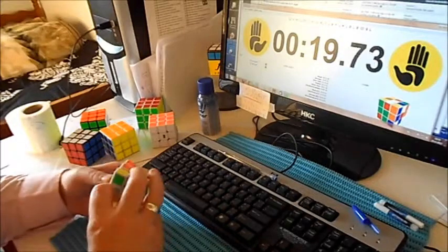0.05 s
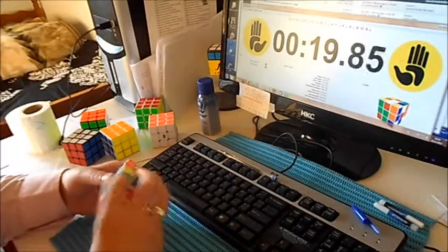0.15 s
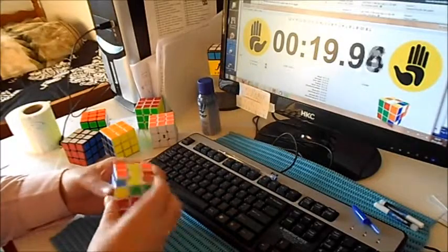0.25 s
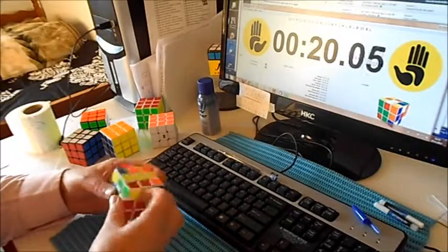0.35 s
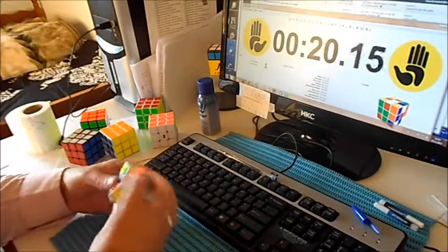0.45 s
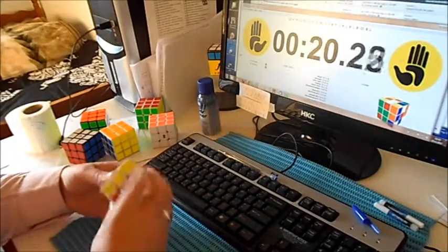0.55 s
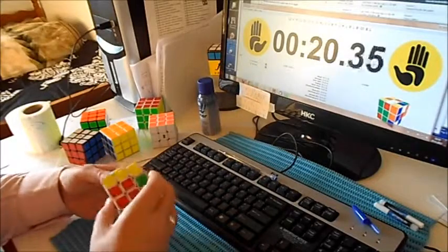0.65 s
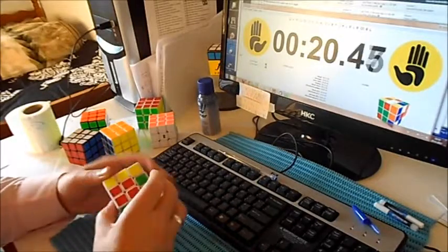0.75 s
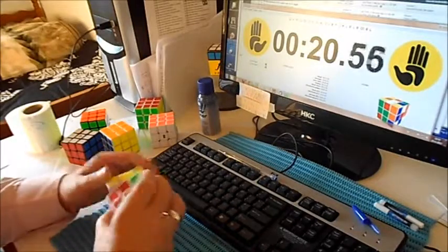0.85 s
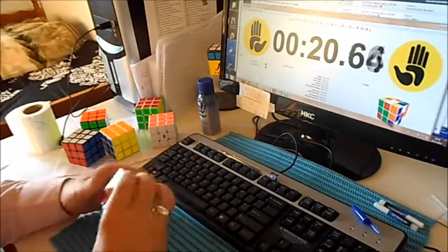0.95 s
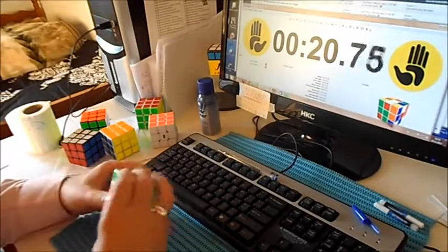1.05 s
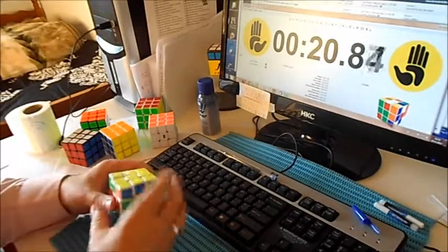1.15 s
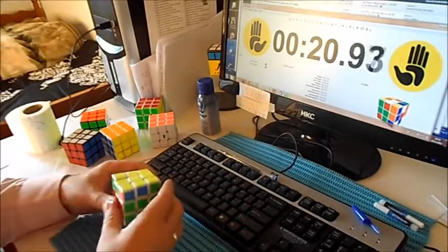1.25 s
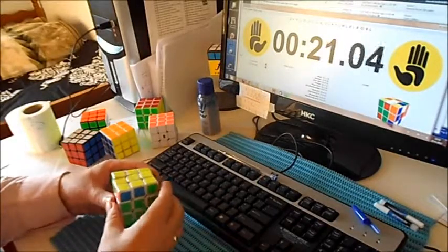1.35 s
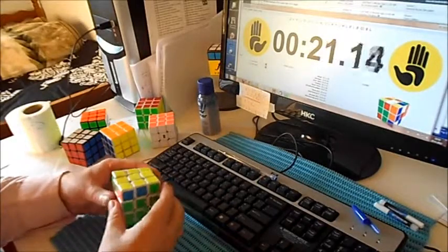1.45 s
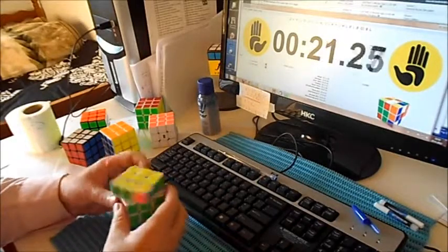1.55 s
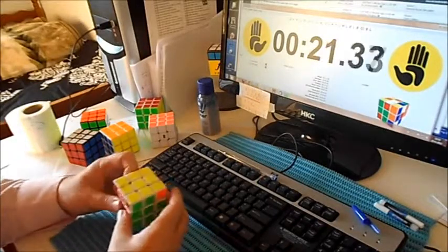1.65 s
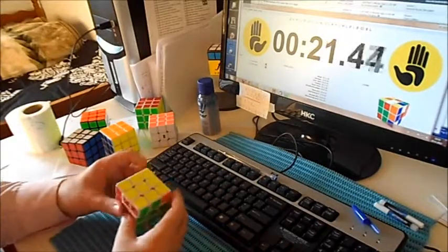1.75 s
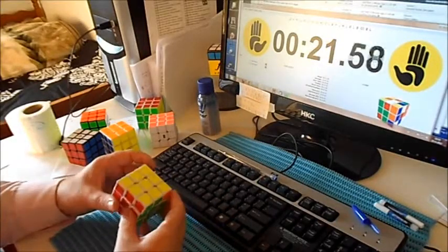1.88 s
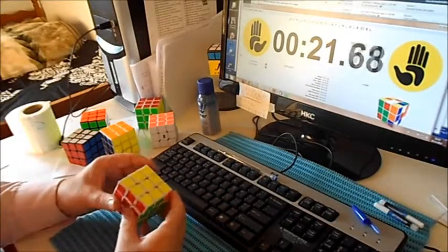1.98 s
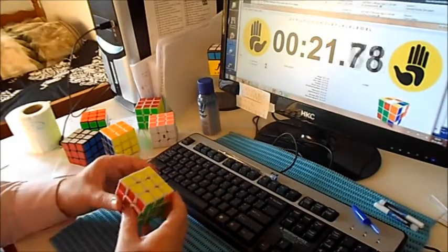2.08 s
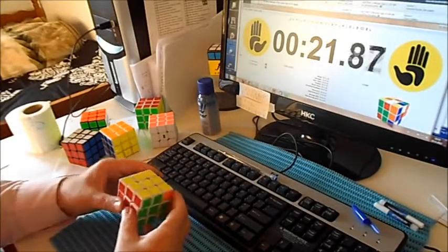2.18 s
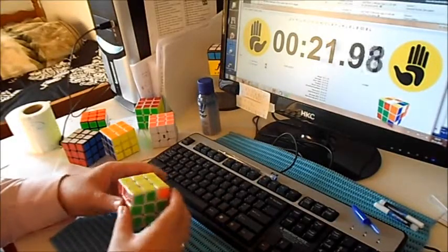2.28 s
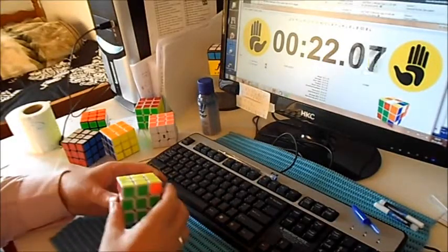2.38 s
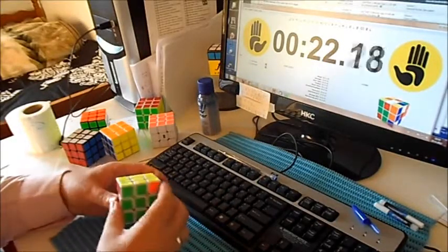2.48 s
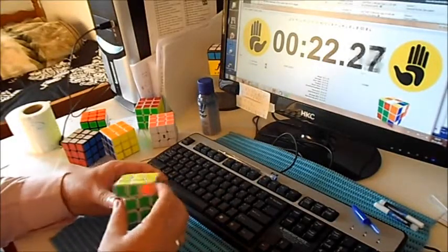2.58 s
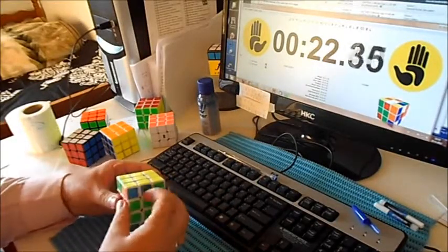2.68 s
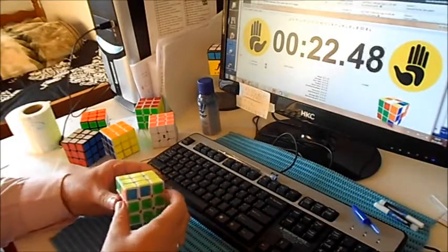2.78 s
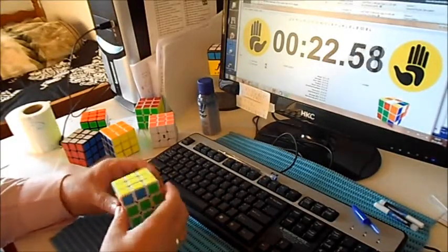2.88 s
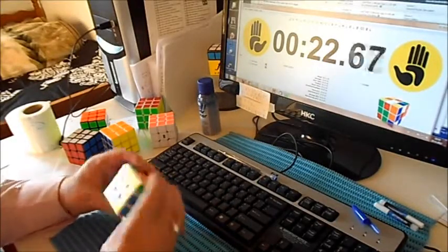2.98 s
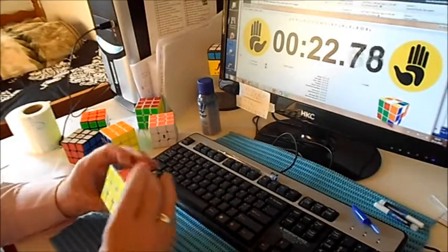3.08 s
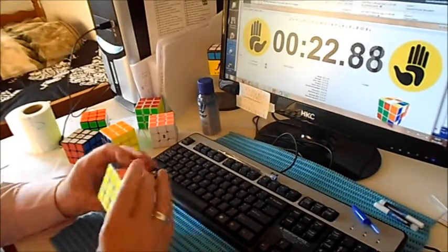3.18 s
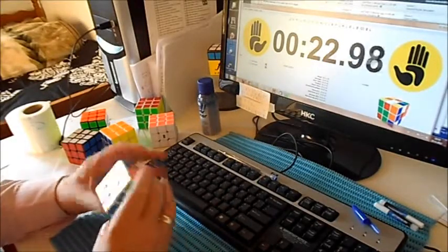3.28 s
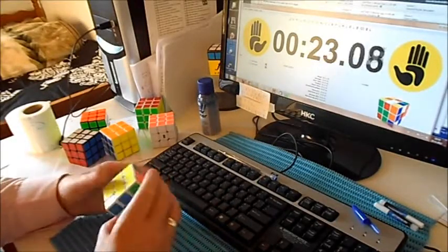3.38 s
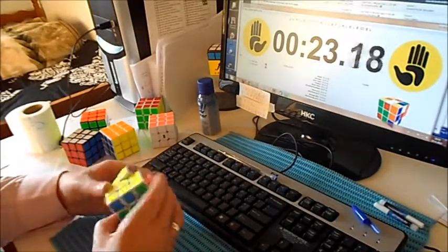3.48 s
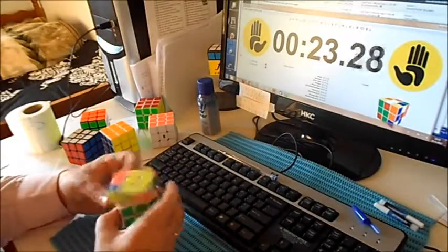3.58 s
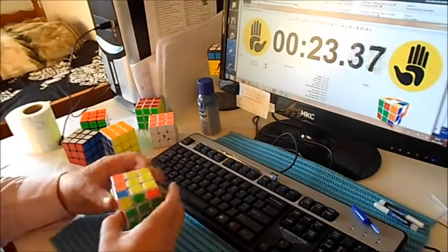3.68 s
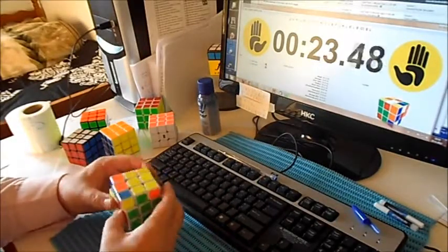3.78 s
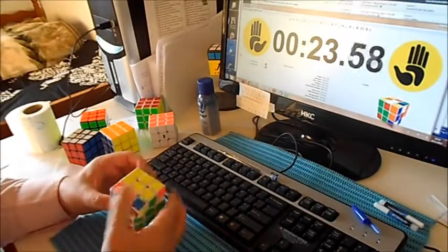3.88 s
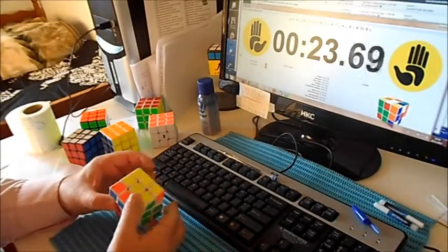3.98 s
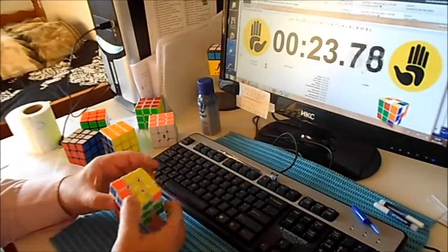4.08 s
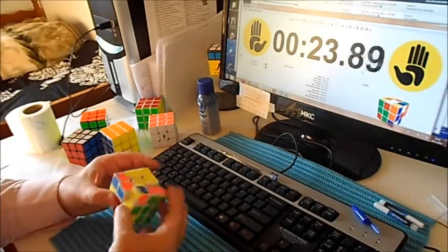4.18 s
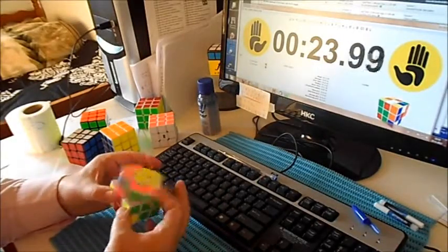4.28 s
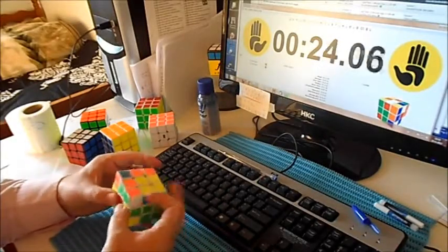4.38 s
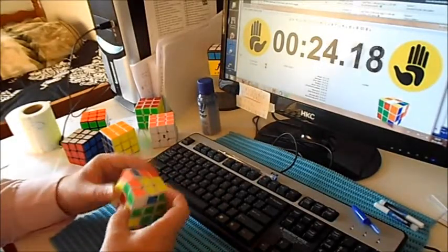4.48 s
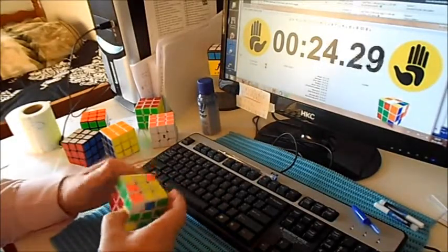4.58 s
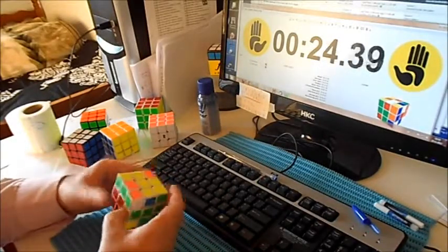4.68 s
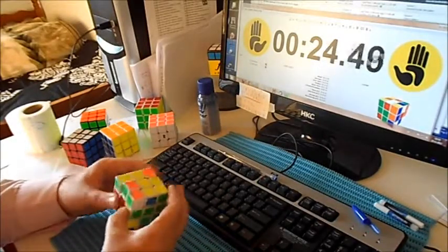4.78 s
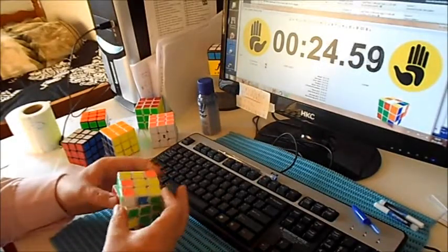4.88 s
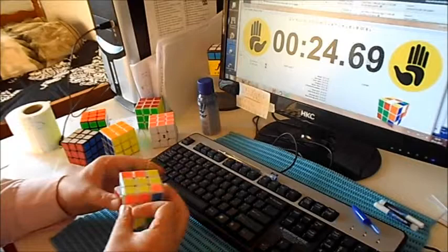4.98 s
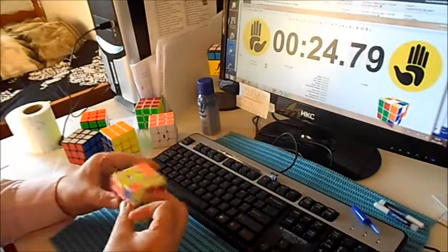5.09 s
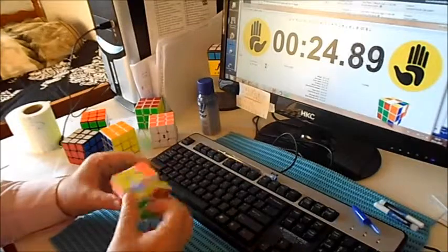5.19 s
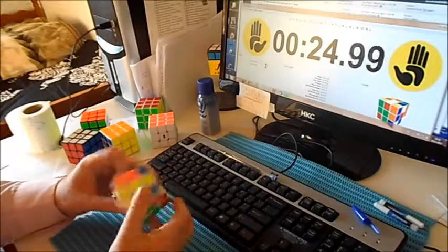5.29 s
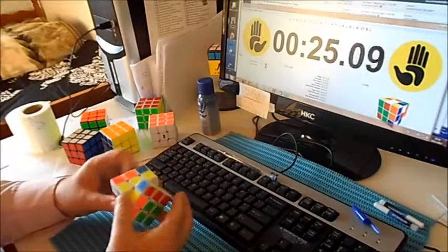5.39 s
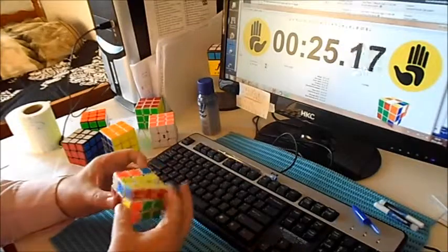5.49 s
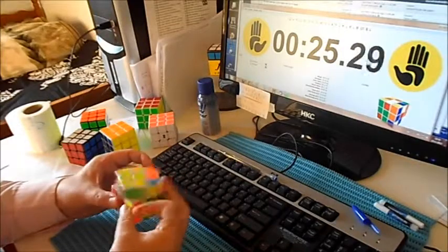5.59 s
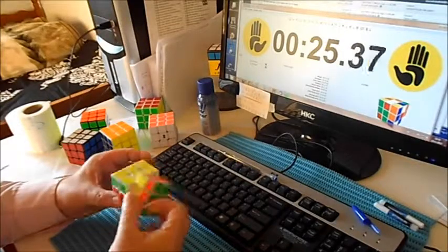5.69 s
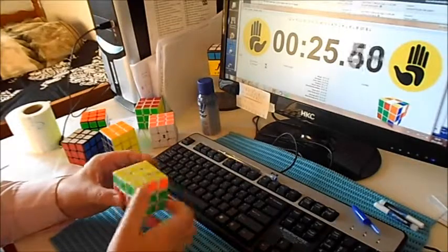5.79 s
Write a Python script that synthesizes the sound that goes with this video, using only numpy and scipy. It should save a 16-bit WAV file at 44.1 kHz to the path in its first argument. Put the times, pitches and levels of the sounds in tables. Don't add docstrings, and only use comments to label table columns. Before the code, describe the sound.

A plastic puzzle cube is turned fast in the hands, dry clacks and rattles in bursts with short pauses, over faint computer hum.

```python
import sys
import numpy as np
from scipy import signal
from scipy.fft import rfft, irfft
from scipy.io import wavfile

SR = 44100
rng = np.random.default_rng(int(sys.argv[2]) if len(sys.argv) > 2 else 0)


def ratio(d):
    e = np.asarray(d, float) / 20
    return 10 ** e


def master(y):
    cut = np.clip(np.atleast_2d(y).T, -1, 1)
    pcm = np.round(cut * 32767)
    wavfile.write(sys.argv[1], SR, pcm.astype(np.int16))


N = 257975

# (frequency [Hz], density [dB per Hz])
PLASTIC = [(710, -49), (1200, -3.5), (2760, -5), (3030, -1), (3860, -2.5), (5540, -2), (8250, -5.5),
           (9840, -9.5), (10300, -7.5), (11000, -8), (14300, -38), (22000, -120)]

# (time [s], peak level [dB], brightest frequency [Hz], rattle t60 [s], edge level [dB])
OPENING = [(0.0386, -22.5, 4970, 0.024, 15), (0.0445, -41, 5040, 0.04, -3), (0.0514, -28, 4440, 0.04, -2.0),
           (0.0568, -22, 5860, 0.046, 5), (0.0646, -19, 7320, 0.066, -1), (0.0742, -12, 4310, 0.041, 12),
           (0.0823, -7.5, 4870, 0.027, -2), (0.0848, -8, 4000, 0.024, -8), (0.0898, -3, 5640, 0.063, 7),
           (0.0981, -7, 5770, 0.069, -11), (0.101, -25, 5770, 0.037, 9), (0.1051, -8, 7350, 0.077, -1),
           (0.1201, -4, 5300, 0.042, 1), (0.1275, -29, 6420, 0.04, -4.0), (0.1325, -42, 3790, 0.04, 0.0),
           (0.1405, -47, 4480, 0.04, 0.0), (0.202, -30, 5430, 0.04, 3), (0.2238, -31, 5000, 0.04, 10),
           (0.2355, -26, 3060, 0.04, -3), (0.2469, -9, 6760, 0.037, -4), (0.2573, -11, 3600, 0.059, 2),
           (0.2631, -13, 6120, 0.03, -8), (0.2778, -7, 7150, 0.044, 8), (0.3063, -18, 5210, 0.036, -6),
           (0.3133, -34, 5860, 0.04, -7), (0.3181, -36, 5860, 0.04, -21)]
TRIGGER = [(0.3512, -16, 4330, 0.045, -9), (0.361, -16, 6200, 0.033, -10), (0.3655, -10, 4860, 0.026, -10),
           (0.3724, -14, 4820, 0.044, -2), (0.3903, -10, 3560, 0.02, -8), (0.3935, -3.5, 5700, 0.031, 21),
           (0.409, -40, 3960, 0.04, 0.0), (0.4141, -36, 6240, 0.04, -4), (0.423, -25, 3880, 0.04, 1.0),
           (0.453, -21, 3720, 0.021, 13), (0.465, -15, 6100, 0.056, 0), (0.478, -22, 3920, 0.037, 2),
           (0.4825, -30, 4650, 0.04, -1.0), (0.495, -26.0, 4780, 0.043, -4.0),
           (0.5108, -21, 4820, 0.048, -8), (0.518, -20, 5380, 0.045, 4), (0.5337, -16, 4820, 0.056, 8),
           (0.5388, -20, 3000, 0.036, 14), (0.5458, -23, 7020, 0.04, -1), (0.5538, -10.5, 8600, 0.029, -4),
           (0.5598, -17, 5860, 0.043, 0), (0.5717, -16, 4940, 0.033, -6), (0.5784, -18, 4690, 0.078, 6),
           (0.5942, -27, 4910, 0.04, 10), (0.6018, -13, 6930, 0.094, -2), (0.6091, -2, 5300, 0.045, 7),
           (0.6105, -1, 5600, 0.049, 5), (0.6254, -50, 5730, 0.04, 6), (0.6387, -53, 4650, 0.04, 1.0),
           (0.677, -37, 3760, 0.04, -2.0)]
SINGLES = [(0.7788, -38.5, 6160, 0.048, 13), (0.8612, -31, 5210, 0.036, 12), (0.8685, -19, 2600, 0.13, 2.5),
           (0.905, -21, 6200, 0.036, -4), (0.9095, -10.5, 4400, 0.054, 2), (0.9324, -17, 4610, 0.025, -7),
           (0.9453, 1.5, 6140, 0.039, 3), (0.9547, -8, 7750, 0.029, -9), (0.9617, -16, 6330, 0.028, 5),
           (0.97, -28, 7450, 0.037, 1), (0.9786, -42, 3270, 0.04, -2.0), (1.0915, -30, 3860, 0.059, -14),
           (1.1374, -35, 6330, 0.032, -6), (1.425, -53, 5170, 0.032, -3), (1.5881, -4.5, 3940, 0.041, 5),
           (1.592, -7.5, 5990, 0.043, -8), (1.5969, -8.5, 4220, 0.035, 3), (1.608, -18, 4260, 0.04, -6.5),
           (1.621, -34, 4610, 0.04, 3), (1.638, -12.5, 4000, 0.04, 11), (1.652, -25, 3320, 0.04, -1),
           (1.657, -13, 6240, 0.058, -3), (1.664, -24, 5340, 0.04, 2), (1.675, -25, 5600, 0.045, -3),
           (1.68, -12, 4650, 0.067, 5.5), (1.6872, -18, 5000, 0.055, -5), (1.6924, -3, 4730, 0.054, 9.5),
           (1.6993, -38, 4600, 0.04, 13), (1.7716, -36.5, 4180, 0.07, 2), (1.8767, -42, 2760, 0.04, 2.0)]
LOOKING = [(1.928, -35, 3530, 0.046, 3), (2.2348, -45, 4500, 0.04, 0), (2.2738, -32.5, 4960, 0.0091, -13),
           (2.407, -40, 3000, 0.037, -3), (2.6447, -19.5, 4820, 0.11, -5), (2.653, -21.5, 4760, 0.048, -7),
           (2.666, -17.5, 5300, 0.033, -5), (2.6793, -30, 5040, 0.04, 6), (2.6857, -21, 7800, 0.04, 12),
           (2.693, -10, 5030, 0.052, -9), (2.699, -31, 4440, 0.04, -3), (2.7104, -4, 5600, 0.023, 21),
           (2.7175, -19, 5680, 0.04, 1), (2.724, -43, 6200, 0.037, -14), (2.9535, -44, 6240, 0.04, 10),
           (3.194, -34.5, 6200, 0.068, 9), (3.2875, -29.5, 3670, 0.083, -6),
           (3.5126, -31.5, 6000, 0.037, -2)]
RESTART = [(3.5386, -18.5, 3940, 0.018, -3), (3.546, -10, 3140, 0.053, 3),
           (3.5495, -15.5, 4150, 0.093, 4.5), (3.597, -14, 5360, 0.022, 10), (3.6028, -8.5, 7110, 0.12, -3),
           (3.632, -7.5, 3600, 0.049, 3), (3.6346, -3.5, 5300, 0.046, 10), (3.6415, -6, 4040, 0.034, 5),
           (3.6479, -17, 5340, 0.035, -3.0), (3.6537, -34, 6160, 0.04, 2.0), (3.6572, -1.5, 3770, 0.024, 3),
           (3.6605, -2.5, 4800, 0.057, 10.5), (3.6645, -25, 8270, 0.053, 16), (3.6717, -32, 5640, 0.04, 7),
           (3.6768, -16, 7240, 0.056, 6), (3.7378, -28.5, 6070, 0.05, -3), (3.7513, -30, 4020, 0.049, -7),
           (3.7718, -63, 4440, 0.04, 3), (3.8598, -32, 3360, 0.034, 9), (3.8854, -23.5, 5460, 0.041, 2),
           (3.9024, -25.5, 2750, 0.052, -3), (3.91, -22.5, 5340, 0.04, 3), (3.9145, -26, 6070, 0.04, -3.0),
           (3.9393, -25.5, 3000, 0.1, -9), (3.95, -10.5, 5400, 0.049, -1), (3.9583, -15.5, 5240, 0.022, -4),
           (4.0485, -32, 5250, 0.04, -2), (4.075, -31, 2700, 0.035, -4)]
SEQUENCE = [(4.125, -28, 3230, 0.028, 0), (4.131, -12.5, 3180, 0.028, -11), (4.145, -31, 5940, 0.037, -2),
            (4.1675, -24, 6330, 0.036, -7), (4.1779, -10.5, 3300, 0.04, 8), (4.1873, -17.5, 6030, 0.07, -5),
            (4.2146, -15, 5370, 0.044, 1), (4.2203, -17, 4460, 0.063, -8), (4.231, -13, 7490, 0.032, -5),
            (4.238, -18.5, 3400, 0.032, -4), (4.2656, -5, 5450, 0.022, -11), (4.28, -36, 4910, 0.04, -5),
            (4.2914, -25, 2970, 0.037, -4.0), (4.305, -28, 3570, 0.036, -9), (4.3194, -26, 5560, 0.04, -9),
            (4.328, -9, 5470, 0.06, 7), (4.335, 2.5, 6000, 0.027, 1), (4.3417, -10.5, 3530, 0.029, -9),
            (4.3577, -20, 5860, 0.04, 3), (4.3667, -8, 5510, 0.052, 3), (4.3646, -3, 6030, 0.068, 7.5),
            (4.3733, -4.5, 5850, 0.053, 5), (4.3887, -13.5, 6200, 0.07, 4), (4.4026, -18, 5000, 0.029, 3),
            (4.4039, -35, 5340, 0.04, 2.0), (4.4204, -50, 5000, 0.04, 6)]
RETURN = [(4.4816, -36, 4050, 0.037, -5), (4.4901, -30, 5330, 0.036, -5), (4.519, -23, 5080, 0.04, 11),
          (4.5228, -26.5, 7800, 0.03, 5), (4.543, -27, 5000, 0.04, -5), (4.5552, -26, 4950, 0.035, -4.0),
          (4.566, -2.5, 4530, 0.055, 4.5), (4.593, -18, 4220, 0.04, 2), (4.5973, -13, 3790, 0.057, 6),
          (4.6031, -9.5, 5700, 0.04, 0), (4.6111, -22, 4950, 0.034, 1.0), (4.6221, -14, 5250, 0.059, 7),
          (4.6379, -10.5, 8800, 0.031, -3), (4.6433, -16, 7970, 0.04, 5)]
REPEAT = [(4.75, -38.5, 3620, 0.04, -9), (4.78, -36, 2760, 0.04, -3), (4.7997, -17, 3100, 0.028, -10),
          (4.9037, -11, 2380, 0.031, 6), (4.914, -29, 2540, 0.036, 1.0), (4.9203, -25, 6070, 0.04, 6),
          (4.9253, -2.5, 5000, 0.031, -1), (4.934, -20, 4950, 0.035, -4.0), (4.952, -24, 6200, 0.036, -6),
          (4.986, -27, 4130, 0.06, -4), (5.0005, -16, 4310, 0.06, 2), (5.018, -7, 4480, 0.023, 3),
          (5.0197, -1, 5470, 0.04, 8.5), (5.0488, -10, 4400, 0.029, 7), (5.0558, -20, 4310, 0.03, -8),
          (5.114, -32, 3010, 0.083, 13), (5.128, -24, 5000, 0.058, 2), (5.138, -12.5, 5100, 0.085, 2),
          (5.152, -12, 5120, 0.11, -2), (5.1582, -9.5, 5030, 0.079, 10), (5.1651, -11.5, 6200, 0.036, 12),
          (5.2312, -21.5, 3880, 0.052, 4), (5.254, -31, 3270, 0.04, -3.0), (5.244, -20, 3820, 0.043, 3),
          (5.271, -13, 6800, 0.037, 5), (5.2765, -7, 3450, 0.022, 10.5), (5.2837, -20, 5000, 0.04, 2.0),
          (5.298, -22, 5210, 0.04, 0)]
CLOSING = [(5.3201, -1.5, 6800, 0.045, 3.5), (5.3508, -15.5, 5300, 0.059, 4),
           (5.3653, -22.5, 3800, 0.037, -3), (5.375, -20, 4030, 0.035, 10), (5.388, -25.0, 4440, 0.043, -5),
           (5.409, -34, 6460, 0.04, -3.0), (5.4164, -15.5, 4450, 0.018, -1.0),
           (5.4224, -25, 3120, 0.04, -6), (5.4428, -16, 6840, 0.03, 12), (5.4935, -47, 4480, 0.04, -7.0),
           (5.558, -44, 3880, 0.04, -4.0), (5.571, -57, 6240, 0.04, -5.0), (5.5822, -19, 5500, 0.054, -10),
           (5.586, -4, 3980, 0.036, -18), (5.5948, -17, 4350, 0.029, -2), (5.5993, -27, 4260, 0.032, 1),
           (5.6138, 0.5, 5600, 0.032, 3), (5.643, -13, 5680, 0.04, 3), (5.6554, -4, 5680, 0.065, 3.5),
           (5.6595, -26, 4870, 0.04, 10), (5.6807, -7, 4960, 0.15, 5.5), (5.696, -15, 5430, 0.037, 5),
           (5.703, -28, 5250, 0.043, 2), (5.7075, -3, 4000, 0.027, 7.5), (5.711, -33, 5210, 0.044, 0),
           (5.734, -19, 3700, 0.059, -3), (5.7538, -9.5, 4050, 0.029, 11), (5.8259, -22, 5770, 0.035, -1)]
CONTACTS = OPENING + TRIGGER + SINGLES + LOOKING + RESTART + SEQUENCE + RETURN + REPEAT + CLOSING


def rms_one(x):
    return x / np.sqrt(np.mean(x ** 2) + 1e-20)


def in_time(rows):
    time_s, level_db = np.transpose(rows)
    return np.interp(np.arange(N) / SR, time_s, level_db)


def colour(x, spectrum):
    hz, level_db = np.transpose(spectrum)
    grid_hz = np.maximum(np.fft.rfftfreq(8192, 1 / SR), 1)
    grid_db = np.interp(np.log(grid_hz), np.log(hz), level_db)
    cepstrum = irfft(np.log(ratio(np.maximum(grid_db, -90))))
    cepstrum[1:4096] *= 2
    cepstrum[4097:] = 0
    return signal.fftconvolve(x, irfft(np.exp(rfft(cepstrum))))[:len(x)]


def drift(rate_hz):
    r = np.exp(-2 * np.pi * rate_hz / SR)
    wander = signal.lfilter([1], [1, -2 * r, r * r], rng.standard_normal(N + SR))
    return rms_one(wander[SR:])


def resonance(x, hz, width_hz):
    r = np.exp(-np.pi * width_hz / SR)
    zeros = np.array([1, 0, -1]) * (1 - r * r) / 2
    poles = [1, -2 * r * np.cos(2 * np.pi * hz / SR), r * r]
    return signal.lfilter(zeros, poles, x)


def add(out, time_s, peak_db, sound):
    at = round(time_s * SR)
    out[at:at + len(sound)] += ratio(peak_db) * sound / np.abs(sound).max()


def coil_whine(fan_db):
    on_s, hz, sag_hz_per_s, level_db, follows = 1.78, 2780, 9, -60, 0.1
    since_s = np.arange(N) / SR - on_s
    level_db = level_db + follows * (fan_db - fan_db.mean()) + 2.5 * drift(30)
    pitch_hz = hz - sag_hz_per_s * np.clip(since_s, 0, 2) + 8 * drift(12)
    singing = np.clip(since_s / 0.1, 0, 1)
    return singing * ratio(level_db) * np.sin(2 * np.pi * np.cumsum(pitch_hz) / SR)


def computer():
    # (time [s], level [dB])
    hum_levels = [(0.0, -40), (0.78, -44.5), (0.9, -38.5), (1.07, -47), (1.22, -38.5), (1.87, -46.5),
                  (1.94, -43), (2.9, -45.5), (3.1, -42.5), (3.36, -46.5), (3.58, -37), (3.76, -44.5),
                  (4.3, -34), (4.4, -42.5), (4.97, -40.5), (5.16, -47.5), (5.8, -43), (5.85, -43)]
    # (time [s], level [dB])
    fan_levels = [(0.0, -48), (0.75, -54.5), (0.93, -44), (0.96, -55.5), (1.09, -51), (1.21, -48),
                  (1.84, -53), (1.94, -49), (2.3, -53), (3.63, -48.5), (3.71, -53), (4.25, -40), (4.4, -51),
                  (4.79, -51), (4.89, -46), (5.1, -54.5), (5.82, -55.5), (5.85, -63)]
    # (frequency [Hz], density [dB per Hz])
    fan_spectrum = [(50, -47), (85, -50), (102, -8.5), (157, -8.5), (271, -7.5), (624, -8.5), (865, -10.5),
                    (3050, -17), (3740, -15), (7170, -22), (9740, -19.5), (11000, -19.5), (14300, -102),
                    (22000, -120)]
    # (frequency [Hz], width [Hz], level re fan noise [dB])
    whine_bands = [(116.4, 2.5, -16), (251.2, 11, -10), (257, 26, -7), (336.5, 7, -9), (7850, 40, -21)]
    hum_db = in_time(hum_levels)
    fan_db = in_time(fan_levels)
    hum = np.sqrt(2) * np.sin(2 * np.pi * 50 * np.arange(N) / SR)
    rumble = ratio(-3.5) * rms_one(resonance(rng.standard_normal(N), 29, 32))
    fan = rms_one(colour(rng.standard_normal(N), fan_spectrum)) * ratio(1 + 0.25 * drift(37))
    whines = sum(ratio(db) * rms_one(resonance(rng.standard_normal(N), hz, width_hz))
                 for hz, width_hz, db in whine_bands)
    return ratio(hum_db + 1) * hum + ratio(fan_db + 1.5) * (fan + rumble + whines) + coil_whine(fan_db)


def gain_control(loud):
    depth_db, knee_db, lag_s, smooth_s = 4, -26.5, 0.052, 0.037
    r = np.exp(-1 / (smooth_s * SR))
    power = signal.lfilter([(1 - r) ** 2], [1, -2 * r, r * r], loud ** 2)
    power = np.interp(np.arange(N) - lag_s * SR, np.arange(N), power)
    return ratio(-depth_db * power / (power + ratio(2 * knee_db)))


def room(x):
    t60_s, gap_s = 0.15, 0.004
    t = np.arange(SR // 2) / SR
    tail = rng.standard_normal(len(t)) * ratio(-60 * t / t60_s) * (t > gap_s)
    tail = signal.lfilter([1], [1, -0.3], tail)
    return signal.fftconvolve(x, tail / np.sqrt(np.sum(tail ** 2)))[:N]


def core(push, near_hz=760, focus_db=0):
    # (frequency [Hz], level [dB], t60 [s])
    core_modes = [(423, -7.5, 0.031), (534, 0, 0.07), (682, -3.5, 0.013), (840, 0.5, 0.033),
                  (955, -6.5, 0.011), (1085.5, -0.5, 0.03)]
    out = np.zeros(len(push))
    for k, (hz, db, t60_s) in enumerate(core_modes):
        level_db = db - focus_db * abs(np.log2(hz / near_hz))
        width_hz = np.log(1000) / np.pi / t60_s
        out += ratio(level_db) * (-1) ** k * resonance(push, hz, width_hz)
    return out


def tiny_contacts(shape):
    per_s, spread_db = (9000 if np.ndim(shape) else 11000), 2.5
    sizes = ratio(spread_db * np.minimum(rng.exponential(1, shape), 4)) * rng.choice([-1, 1], shape)
    return sizes * (rng.random(shape) < per_s / SR) + 1e-9


def slide():
    # (time [s], level [dB])
    hand_effort = [(0.0, -40), (0.13, -44), (0.47, -39), (0.65, -57), (0.9, -46), (1.07, -61), (2.12, -58),
                   (2.77, -55.5), (3.89, -56), (4.24, -34.5), (4.46, -76), (4.61, -57), (4.92, -71),
                   (5.16, -82), (5.28, -40), (5.42, -58), (5.65, -38.5), (5.85, -48)]
    stroke_s, stroke_follows, scrape_db, rumble_db = 0.011, 0.6, -27, -36.5
    time_s, peak_db = np.transpose(CONTACTS)[:2]
    force = np.bincount((time_s * SR).astype(int), ratio(stroke_follows * peak_db), N)
    stroke = signal.fftconvolve(force, np.exp(-np.arange(SR // 4) / (stroke_s * SR)))[:N]
    effort = ratio(in_time(hand_effort) - 7.5)
    grip = ratio(2.6 * drift(60))
    scrape = rms_one(grip * colour(tiny_contacts(N), PLASTIC))
    rumble = rms_one(grip * core(rng.standard_normal(N)))
    scrape = (ratio(scrape_db) * stroke + effort) * scrape
    return scrape + (ratio(rumble_db) * stroke + ratio(-7) * effort) * rumble


def knocks():
    # (time [s], peak level [dB], centre frequency [Hz])
    square_blows = [(0.0828, -27, 810), (0.1047, -10.5, 840), (0.1123, -24, 690), (0.1197, -25, 970),
                    (0.2462, -24, 770), (0.2617, -25, 920), (0.2778, -30, 780), (0.4206, -26, 740),
                    (0.6096, -24.5, 1000), (0.6175, -25, 700), (0.9094, -23, 910), (0.9442, -22.5, 1010),
                    (1.5879, -18, 910), (2.7115, -23, 840), (3.552, -22, 840), (3.6572, -18.5, 780),
                    (3.6826, -25.5, 594), (3.9509, -24.5, 810), (4.187, -25, 830), (4.2112, -25, 780),
                    (4.3709, -20, 760), (4.3883, -26, 620), (4.5658, -24.5, 794), (5.02, -21, 614),
                    (5.0327, -18, 690), (5.2758, -23.5, 636), (5.3198, -18, 720), (5.6146, -29.5, 770),
                    (5.682, -24.5, 870), (5.7068, -23.5, 780)]
    glance_db, follows, lag_s, glance_hz, spread_oct = -29, 0.44, 0.00098, 830, 0.033
    t = np.arange(4096) / SR
    out = np.zeros(N + len(t))
    blows = list(square_blows)
    for (time_s, db, *_), place in zip(CONTACTS, rng.standard_normal(len(CONTACTS))):
        blows.append((time_s + lag_s, glance_db + follows * db, glance_hz * 2 ** (spread_oct * place)))
    for time_s, peak_db, hz in blows:
        push = rng.standard_normal(len(t)) * ratio(-60 * t / 0.005)
        add(out, time_s - 0.0008, peak_db, core(push, hz, focus_db=19))
    return out[:N]


def snaps():
    lead_s, lead_db, lead_n = 0.0044, -25, 512
    t = np.arange(8192) / SR
    out = np.zeros(N + len(t))
    grains = tiny_contacts((len(CONTACTS), len(t)))
    loose_hz = 2200 * (9000 / 2200) ** rng.random((len(CONTACTS), 2))
    rise = 1 - np.exp(-t / 0.00024)
    edge = signal.butter(2, 6800, "high", fs=SR)
    for (time_s, peak_db, hz, t60_s, edge_db), grain, others_hz in zip(CONTACTS, grains, loose_hz):
        grain = colour(grain, PLASTIC) * rise
        grain = grain + (ratio(edge_db) - 1) * signal.lfilter(*edge, grain)
        crack = grain * np.exp(-(t / 0.001) ** 2)
        crack = crack + 5.36 * resonance(crack, hz, 0.11 * hz)
        rattle = grain * ratio(-8.5 - 60 * t / max(t60_s, 0.008))
        others = sum(resonance(rattle, f, 0.59 * f) for f in others_hz)
        rattle = rattle + 5.1 * resonance(rattle, hz, 0.46 * hz) + 2.1 * others
        add(out, time_s, peak_db, crack + rattle)
        binding = grain[-lead_n:] * np.exp(-t[lead_n - 1::-1] / lead_s)
        add(out, time_s - lead_n / SR, peak_db + lead_db, binding)
        add(out, time_s, peak_db - 40, core(grain * ratio(-60 * t / 0.015)))
    return out[:N]


def scene():
    cube = snaps() + knocks() + slide()
    return (cube + ratio(-13.5) * room(cube) + gain_control(cube) * computer())[None]


def top_cut(x):
    return signal.sosfilt(signal.butter(12, 11680, fs=SR, output="sos"), x)


def record(dry):
    cutoff_hz = 10645
    x = 0.97 * np.tanh(dry / 0.97)
    steep = signal.cheby2(14, 70, cutoff_hz * 1.0856, fs=SR, output="sos")
    x = signal.sosfilt(steep, x)
    x = x - 0.064 * x ** 3 * np.abs(x) ** 2
    return top_cut(x)


dry = scene()
out = record(dry)
master(out)
```